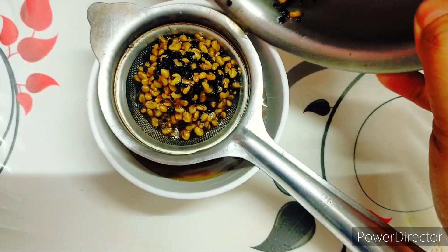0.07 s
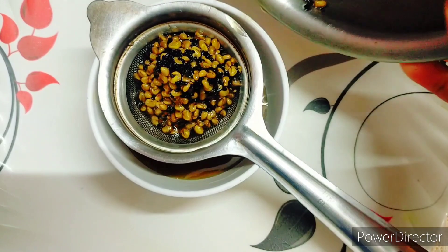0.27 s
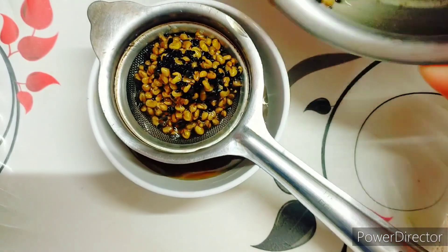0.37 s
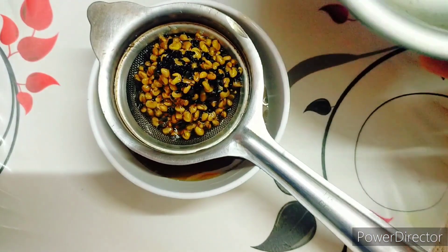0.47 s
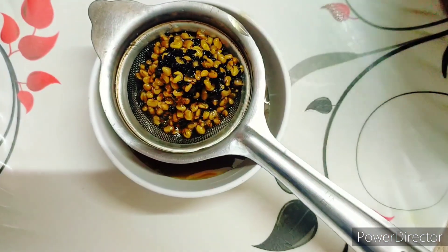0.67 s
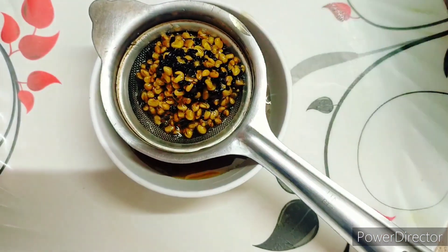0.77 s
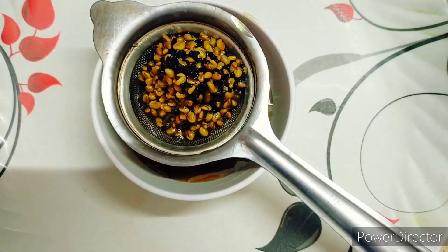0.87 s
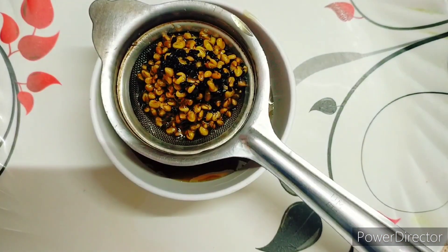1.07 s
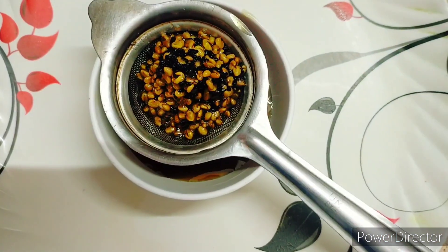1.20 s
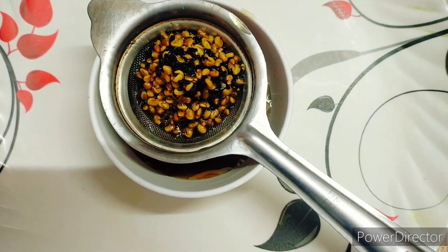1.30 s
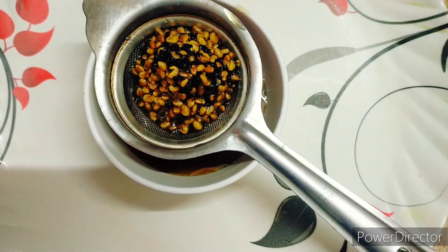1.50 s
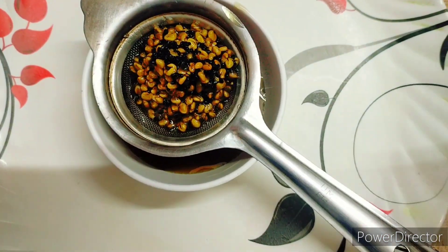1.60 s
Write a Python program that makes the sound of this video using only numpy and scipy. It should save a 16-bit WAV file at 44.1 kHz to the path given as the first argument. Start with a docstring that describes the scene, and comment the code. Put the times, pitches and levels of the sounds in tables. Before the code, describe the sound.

Steel pot knocking against a tea strainer, close and dry in a small room. Quiet low rumble until 0.2 s, then clustered clacks and gritty scraping to 0.44 s, loudest around 0.31-0.33, with table thumps and a brief squeal near 0.41. The handle's ring fades. A faint puff comes at 0.65, thin steel tone around 0.75, tiny ticks to 1.05, soft sliding from 1.3, light clinks at 1.5-1.6 and a tiny squeak.

```python
"""Steel pot lifted off a tea strainer

Close on a table: a pot leaves a strainer lying across a bowl, with knocks as clacks of noise and ringing modes.
It drags along the rim as tiny slips, hiss and catches, then squeals free; the table thumps, the handle beats.
Around this: a faint early burst of very high hiss, a steel tone, a soft puff, ticks, a slide, clinks, a squeak.
A short noise tail makes the room; coloured noise and a low sine make its floor and hum, under a low cut."""
import sys
import numpy as np
from scipy import signal
from scipy.fft import rfft, irfft
from scipy.io import wavfile

SR = 44100
rng = np.random.default_rng(int(sys.argv[2]) if len(sys.argv) > 2 else 0)


def master(y):
    """Save y as 16-bit WAV."""
    cut = np.clip(np.atleast_2d(y).T, -1, 1)
    pcm = np.round(cut * 32767)  # scale
    wavfile.write(sys.argv[1], SR, pcm.astype(np.int16))


N = 72765
T = np.arange(N) / SR  # s
RING_T = T[:SR // 2]  # s, the half second given to each struck sound

# Room floor spectrum: [f/Hz, relative level per Hz/dB]
FLOOR_COLOUR = [(30, -23.5), (50, -21.5), (110, 0.5), (150, 2), (200, -6.5), (270, -7), (400, -11.5),
                (800, -18), (2000, -23), (3000, -26.5), (4200, -36.5), (12000, -40), (15500, -34)]
# Room reverberation: [f/Hz, time to fall 60 dB/s]
ROOM_T60 = [(150, 0.28), (1000, 0.52), (2500, 0.29), (5000, 0.19), (9000, 0.21), (15000, 0.23)]
# Soft slide: [t/s, level/dB]; its spectrum: [f/Hz, relative level per Hz/dB]
SLIDE_PATH = [(1.25, -84), (1.32, -73.5), (1.345, -60), (1.385, -59), (1.48, -68.5), (1.57, -67),
              (1.65, -60.5)]
SLIDE_COLOUR = [(1000, -6), (2000, 3.5), (4000, -5.5), (7000, 2.5), (8300, 11.5), (10500, -5.5),
                (12500, -6), (15200, 5.5)]
# A faint early burst of very high hiss, one soft puff, then small ticks and taps:
# [t/s, level/dB, centre f/Hz, half width at -6 dB/octaves, t60/s]
NOISE_BURSTS = [(0.168, -57, 15100, 0.46, .025), (0.645, -59.5, 1720, 0.86, 0.39),
                (.811, -65, 11500, 0.99, 0.095), (.903, -62.5, 4900, 0.71, 0.024),
                (1.023, -64, 4630, 0.16, 0.015), (1.054, -67, 4587, 0.12, 0.02),
                (1.6048, -52.5, 4070, 2.6, 0.05), (1.64, -56, 2015, 1.1, 0.1)]
# Light touches of steel: [t/s, level/dB, brightness/0-1, free ringing/0-1]
CLINKS = [(1.518, -54, .4, 0.25), (1.6066, -53.5, 0.99, 1)]
# Clink modes, before brightness and free ringing scale them: [f/Hz, level/dB, t60/s]
CLINK_MODES = [(1841, -2.5, 0.22), (2620, -5, 0.226), (4370, -10.5, 0.28), (4855, -9, 0.28),
               (6520, -2.5, 0.24), (8180, 4.5, 0.049), (11440, 1.5, 0.09), (14970, 11, 0.051)]
# Thin squeak, lower partial: [t/s, f/Hz, level/dB]
SQUEAK_PATH = [(1.637, 9500, -64), (1.641, 9200, -58.5), (1.65, 9200, -68)]
# Faint steel tone: [t/s, upper partial level/dB, lower partial level/dB]
SING_PATH = [(.698, -63.5, -68), (.745, -56, -63.5), (.773, -63.5, -64), (.795, -62.5, -70.5),
             (.932, -66, -66), (.99, -72, -78.5), (1.136, -79, -75), (1.2, -85, -91)]
# Table thumps: [t/s, level/dB]; low modes of the table top: [f/Hz, level/dB, t60/s]
THUMPS = [(0.226, -27.5), (0.318, -21.5), (.385, -52)]
TABLE_MODES = [(122, 2, 0.2), (135, 1.5, 0.2), (238.6, -8, .12)]
# Drag along the rim: [t/s, grating level/dB, treble hiss level/dB]
DRAG_PATH = [(.219, -69.5, -63.5), (.226, -30.5, -35), (.25, -40.5, -49.5), (.28, -41, -48),
             (.305, -30, -37.5), (.325, -33, -42.5), (.372, -31.5, -41), (.405, -40.5, -30.5),
             (.423, -29, -42.5), (.438, -61, -51)]
# Spectra of the grating and the hiss: [f/Hz, relative level per Hz/dB]
GRATE_COLOUR = [(150, -24), (450, -12), (1300, -7), (1850, -2), (2100, -8.5), (2400, 3), (2800, -5.5),
                (3400, -11), (7600, -22.5), (8300, -7), (9000, -29), (15500, -36)]
HISS_COLOUR = [(1500, -20), (4000, -6.5), (8300, 1), (9700, -1), (11200, -7.5), (12600, -1.5), (15200, 2)]
# Squeal of the rim as it slips free: [t/s, f/Hz, level/dB]
SQUEAL_PATH = [(.395, 4790, -60), (.41, 4510, -41), (.424, 4375, -42), (.445, 4420, -57.5),
               (.52, 4310, -90)]
# Knocks: [t/s, clack level/dB, clack tilt/dB per octave, clack t60/s, pot ring/dB, strainer ring/dB]
KNOCKS = [(0.2216, -19, -1, 0.049, -34, -59), (0.2237, -19.5, -5, 0.041, -30, -57),
          (0.2312, -27, 2.5, 0.022, -43.5, -60), (0.265, -35, 0, 0.015, -47, -69.5),
          (0.2992, -28.5, -2.5, 0.036, -32.5, -54), (0.3107, -9.5, 1, 0.05, -28.5, -19),
          (0.3162, -25.5, 0, 0.022, -38, -44.5), (0.3272, -23, -2, 0.014, -46.5, -42.5),
          (0.3329, -17.5, 0, 0.026, -33.5, -38), (0.3621, -29.5, -4.5, 0.0235, -47, -53),
          (0.402, -32.5, 4, 0.015, -39, -42.5)]
# Hard rim-to-rim contacts: [t/s, level/dB]
PINGS = [(0.2239, -10.5), (0.2634, -28), (0.311, -14), (0.3155, -14.5), (0.3334, -8.5), (0.4012, -18)]
# Modes of the pot and of the strainer: [f/Hz, level/dB, t60/s]
POT_MODES = [(925, -9.5, 0.051), (1409, -13, 0.1), (1676, -5, 0.086), (1844, 3, 0.08), (2455, 3, 0.045),
             (2717, -4, 0.13), (3075, -12.5, 0.1), (3743, -15.5, 0.13), (5540, -15.5, 0.054),
             (7390, -11.5, 0.055)]
STRAINER_MODES = [(470.2, -9, 0.095), (655, -8, .09), (792, -11.5, 0.13), (2210, -9.5, 0.15),
                  (2340, -5.5, 0.16), (2424, -9.5, 0.18), (2659, -8, 0.19), (2745, -11, 0.19),
                  (4300, -17, .08), (5246, -9.5, 0.049), (8334, -9, 0.21)]
# Knock clack spectrum: [f/Hz, relative level per Hz/dB]
CLACK_COLOUR = [(100, -34), (330, -14.5), (500, -9), (1100, -8.5), (1500, -7), (2600, 1.5), (3100, -2),
                (3500, -17.5), (6000, -16.5), (8300, -15.5), (9500, -31), (15500, -31.5)]

FLOOR_DB = -57.5
HUM_HZ, HUM_DB, HUM_PEAK_S, HUM_SWELL_S = 155, -61.5, 1.224, 0.18
ROOM_DB, ROOM_RISE_S = -21, 0.0045
CLINK_TOP_HZ = 19300  # -6 dB point at brightness 1
SQUEAK_TOP_DB = 3.5  # upper partial, relative to the lower
SING_UPPER_HZ, SING_LOWER_HZ = 2995, 2648
SING_WAVER_DB, SING_WAVER_SHARE = 2.5, 0.00478
TABLE_RISE_S = 0.011
BODY_DB, BODY_WIDTH_HZ = 8.5, 53  # contact noise gathers round the modes of the steel
RIPPLE_DB, RIPPLE_HZ = 4, 100.1  # the crowded upper modes of thin steel
SLIPS_PER_S, GRATE_DB, JUDDER_DB, JUDDER_S = 8000, -3.5, 3.5, 0.0055
# burrs on the rim; the rate is nominal, since its unevenness varies it
CATCHES_PER_S, CATCH_UNEVEN_DB, CATCH_RING_DB, CATCH_CLICK_DB = 170, 4.5, -3.5, -6.5
HELD_SHARE, SQUEAL_WAVER = 0.55, 0.0042  # contact shortens the ring and shakes the squeal
KNOCK_RISE_S = 0.0005
PING_HZ, PING_RISE_S = 2472, 0.001
HANDLE_HZ, HANDLE_DB, HANDLE_T60, HANDLE_BEAT_HZ = 1164.2, 0, 0.3, 4.1
LOW_CUT_HZ, EDGE_HZ = 92, 15600


def amp(db):
    """Amplitude ratio of a level in dB."""
    return 10 ** (np.asarray(db) / 20)


def evened(x):
    """Brings x to unit RMS."""
    return x / np.sqrt(np.mean(x ** 2) + 1e-20)


def read(points, hz):
    """Reads a spectrum table by straight lines over log frequency."""
    f, value = np.transpose(points)
    return np.interp(np.log(hz + 1), np.log(f + 1), value)


def curve(rows, index=1):
    """One column of a table, joined by lines in time."""
    rows = np.array(rows)
    return np.interp(T, rows[:, 0], rows[:, index])


def within(rows):
    """True between the first and last times of a table."""
    return (T > rows[0][0]) & (T < rows[-1][0])


def add(mix, s, sound):
    """Lays a sound into the mix at s seconds, cut at the end."""
    part = mix[max(round(s * SR), 0):][:len(sound)]
    part += sound[:len(part)]


def coloured(x, db_at):
    """Weights the spectrum of x by db_at(Hz), then brings it to unit RMS."""
    hz = np.fft.rfftfreq(len(x), 1 / SR) + 1
    return evened(irfft(rfft(x) * amp(db_at(hz)), len(x)))


def wander(seconds):
    """Slow random movement of unit RMS, on the given time scale."""
    return coloured(rng.standard_normal(N), lambda hz: -20 * np.log10(1 + (hz * seconds) ** 4))


def decay(t60):
    """Exponential fall of 60 dB in t60 seconds."""
    return np.exp(-np.log(1000) * RING_T / t60)


def burst(db_at, t60, size=512):
    """A dense cluster of short-lived modes: evenly filled noise that dies away."""
    phases = 2 * np.pi * rng.random((len(RING_T) // size + 1, size // 2 + 1))
    noise = irfft(np.exp(1j * phases)).ravel()[:len(RING_T)]
    return coloured(noise, db_at) * decay(t60)


def ring(modes):
    """Decaying sine modes of a struck object."""
    return sum(amp(db) * decay(t60) * np.sin(2 * np.pi * hz * RING_T) for hz, db, t60 in modes)


def tone(hz):
    """Unit-RMS sine that follows a frequency path."""
    return np.sqrt(2) * np.sin(2 * np.pi * np.cumsum(hz) / SR)


def body(modes, hz):
    """Nearness (0-1) of each frequency to a mode of the steel."""
    return np.max([1 / (1 + ((hz - mode[0]) / BODY_WIDTH_HZ) ** 2) for mode in modes], axis=0)


def ripple():
    """Random peaks and gaps above the main modes, as (Hz, dB)."""
    hz = np.arange(3000, SR / 2, RIPPLE_HZ)
    db = RIPPLE_DB * rng.standard_normal(len(hz))
    db[0] = 0  # also holds the response flat below
    return np.c_[hz, db]


def floor():
    """The low, uneven rumble of the room, with a hum that swells once."""
    swell = np.exp(-((T - HUM_PEAK_S) / HUM_SWELL_S) ** 2)
    hum = amp(HUM_DB) * tone(np.full(N, HUM_HZ)) * swell
    rumble = coloured(rng.standard_normal(N), lambda hz: read(FLOOR_COLOUR, hz))
    return hum + rumble * amp(FLOOR_DB + 0.7 * wander(0.023))


def room(x):
    """A small room: a noise tail whose decay time depends on frequency, shorter in the treble."""
    hz, t, z = signal.stft(rng.standard_normal(len(RING_T)), SR, nperseg=256)
    fading = z * np.exp(-np.log(1000) * t / read(ROOM_T60, hz)[:, None])
    tail = signal.istft(fading, SR)[1][:len(RING_T)]
    tail = tail * np.minimum(RING_T / ROOM_RISE_S, 1)
    return signal.fftconvolve(x, tail / np.linalg.norm(tail))[:N]


def slide():
    """A soft slide: coloured friction noise with a restless level."""
    noise = coloured(rng.standard_normal(N), lambda hz: read(SLIDE_COLOUR, hz))
    return noise * amp(curve(SLIDE_PATH) + wander(0.013)) * within(SLIDE_PATH)


def noise_bursts():
    """A high hiss, a soft puff, ticks and taps: decaying noise, each gathered round one frequency."""
    out = np.zeros(N)
    for s, db, centre_hz, octaves, t60 in NOISE_BURSTS:
        def colour(hz):
            return -20 * np.log10(1 + (np.log2(hz / centre_hz) / octaves) ** 2)
        add(out, s, amp(db) * burst(colour, t60))
    return out


def clinks():
    """Light touches of steel: a duller touch loses treble, a held one rings shorter."""
    out = np.zeros(N)
    for s, db, bright, free in CLINKS:
        modes = []
        for hz, level, t60 in CLINK_MODES:
            treble_loss = 20 * np.log10(1 + (hz / (bright * CLINK_TOP_HZ)) ** 4)
            modes.append((hz, level - treble_loss, t60 * free))
        add(out, s, amp(db) * ring(modes))
    return out


def squeak():
    """A thin squeak: two gliding partials at a fixed ratio."""
    hz = curve(SQUEAK_PATH)
    partials = tone(hz) + amp(SQUEAK_TOP_DB) * tone(hz * 1.45)
    return partials * amp(curve(SQUEAK_PATH, index=2)) * within(SQUEAK_PATH)


def sing():
    """Two faint wavering steel partials that trade strength and fade slowly."""
    out = np.zeros(N)
    for index, hz in [(1, SING_UPPER_HZ), (2, SING_LOWER_HZ)]:
        level = amp(curve(SING_PATH, index) + SING_WAVER_DB * wander(0.015))
        out += level * tone(hz * (1 + SING_WAVER_SHARE * wander(0.02)))
    return out * within(SING_PATH)


def table():
    """The table top swells into its low modes under the bowl."""
    out = np.zeros(N)
    thump = ring(TABLE_MODES) * (1 - np.exp(-(RING_T / TABLE_RISE_S) ** 2))
    for s, db in THUMPS:
        add(out, s, amp(db) * thump)
    return out


def squeal():
    """The rim sings as it slips free: one shaken tone, falling overall."""
    hz = curve(SQUEAL_PATH) * (1 + SQUEAL_WAVER * wander(JUDDER_S))
    return tone(hz) * amp(curve(SQUEAL_PATH, index=2)) * within(SQUEAL_PATH)


def drag(upper):
    """Tiny uneven slips of steel on steel grate and hiss; burrs catch and ring the modes."""
    steel = POT_MODES + STRAINER_MODES
    slips = (rng.random(N) < SLIPS_PER_S / SR) * rng.standard_normal(N)
    judder = amp(JUDDER_DB * wander(JUDDER_S))

    # one impulse each time the running count of catches passes a whole number
    catch_rate = CATCHES_PER_S * amp(CATCH_UNEVEN_DB * wander(JUDDER_S))
    catches = evened(np.diff(np.floor(np.cumsum(catch_rate) / SR), prepend=0))
    clicks = amp(CATCH_CLICK_DB) * catches * rng.uniform(0.68, 1, N)

    def grate_colour(hz):
        return read(GRATE_COLOUR, hz) + BODY_DB * body(steel, hz) + read(upper, hz)

    def hiss_colour(hz):
        return read(HISS_COLOUR, hz) + read(upper, hz)

    grate = coloured(evened(slips * judder) + clicks, grate_colour)
    hiss = coloured(evened(rng.standard_normal(N) * np.sqrt(judder)) + clicks, hiss_colour)

    touching = within(DRAG_PATH)
    force = touching * amp(curve(DRAG_PATH))
    hiss_level = touching * amp(curve(DRAG_PATH, index=2))
    modes = [ring([(hz, read(GRATE_COLOUR, hz), t60 * HELD_SHARE)]) for hz, _, t60 in steel]
    # every mode gets its own random strength at each catch
    ringing = sum(signal.fftconvolve(force * catches * rng.standard_normal(N), mode)[:N] for mode in modes)
    ringing = ringing / np.linalg.norm(modes)
    return amp(GRATE_DB) * grate * force + amp(CATCH_RING_DB) * ringing + hiss * hiss_level


def pings():
    """Hard rim-to-rim contacts: very short pulses of one frequency."""
    out = np.zeros(N)
    u = RING_T / PING_RISE_S
    ping = u * np.exp(1 - u) * np.sin(2 * np.pi * PING_HZ * RING_T)
    for s, db in PINGS:
        add(out, s, amp(db) * ping)
    return out


def knocks(upper):
    """Each knock clacks and rings pot and strainer, whose handle is a close pair of modes that beat."""
    out = np.zeros(N)
    handle = ring([(HANDLE_HZ, HANDLE_DB, HANDLE_T60)]) * np.cos(np.pi * HANDLE_BEAT_HZ * RING_T)
    pot = ring(POT_MODES)
    strainer = ring(STRAINER_MODES) + handle
    rise = np.minimum(RING_T / KNOCK_RISE_S, 1)
    for s, db, tilt, t60, pot_db, strainer_db in KNOCKS:
        # the clack takes the modes of whichever object has the higher ring level
        struck = STRAINER_MODES if strainer_db > pot_db else POT_MODES

        def colour(hz):
            tilt_db = tilt * np.log2(np.clip(hz / 2000, 1, 4))  # acts from 2 to 8 kHz
            return read(CLACK_COLOUR, hz) + BODY_DB * body(struck, hz) + read(upper, hz) + tilt_db

        clack = amp(db) * burst(colour, t60)
        add(out, s, (clack + amp(pot_db) * pot + amp(strainer_db) * strainer) * rise)
    return out


def scene():
    """The close sounds, their room tail below them, and the room floor."""
    upper = ripple()
    handling = slide() + noise_bursts() + clinks() + squeak()
    near = handling + sing() + table() + squeal() + drag(upper) + pings() + knocks(upper)
    return (floor() + amp(ROOM_DB) * room(near) + near)[None]


def record(dry):
    """The microphone's low cut, then the band limit."""
    low_cut = signal.butter(2, LOW_CUT_HZ, "high", fs=SR, output="sos")
    thinned = signal.sosfilt(low_cut, dry)
    band_limit = signal.firwin(801, EDGE_HZ, window=("kaiser", 8), fs=SR)
    return signal.oaconvolve(thinned, band_limit[None], "same")


dry = scene()
out = record(dry)
master(out)
```